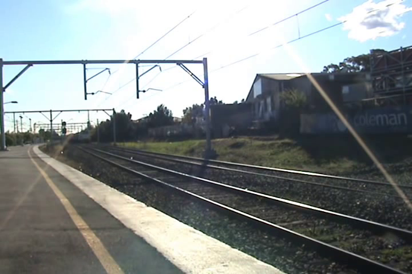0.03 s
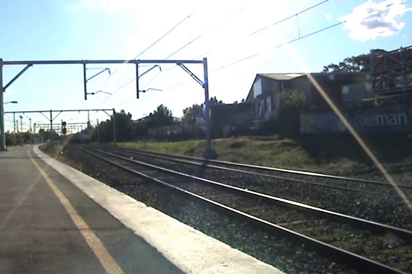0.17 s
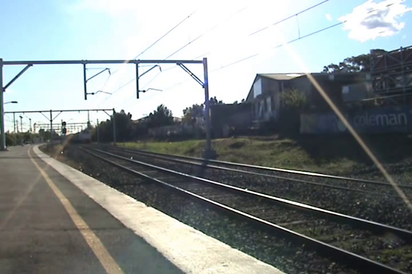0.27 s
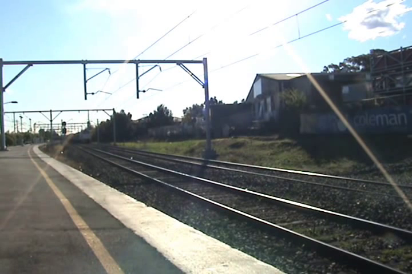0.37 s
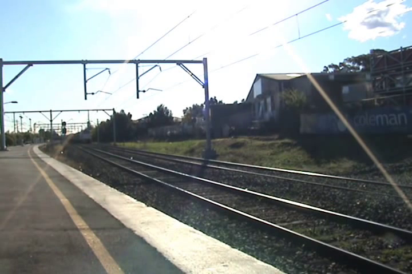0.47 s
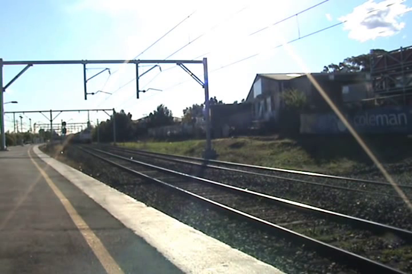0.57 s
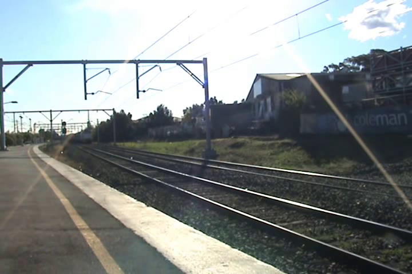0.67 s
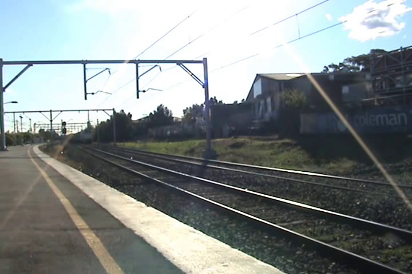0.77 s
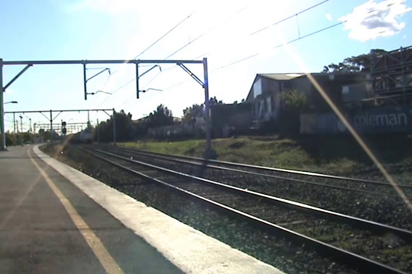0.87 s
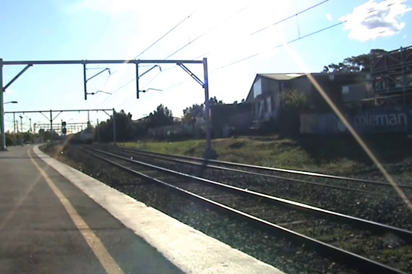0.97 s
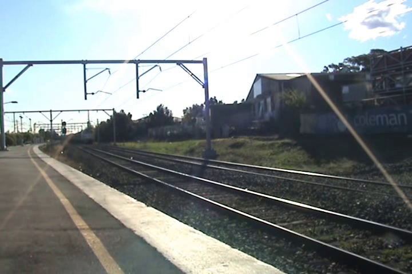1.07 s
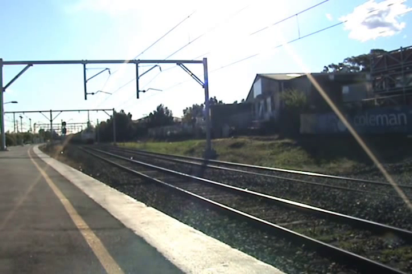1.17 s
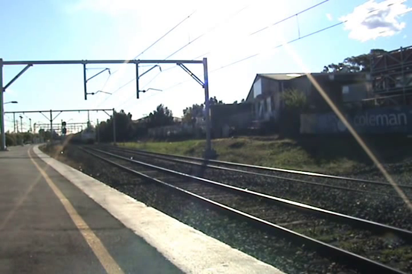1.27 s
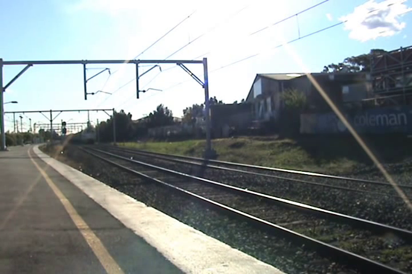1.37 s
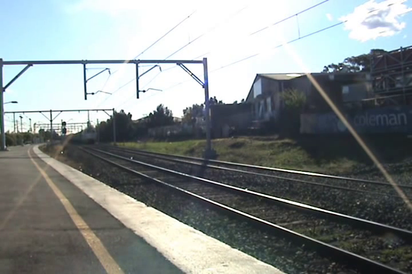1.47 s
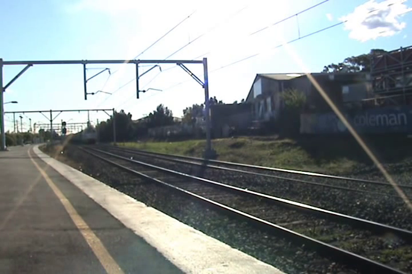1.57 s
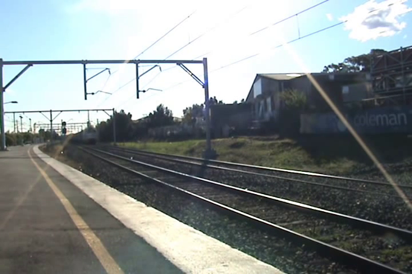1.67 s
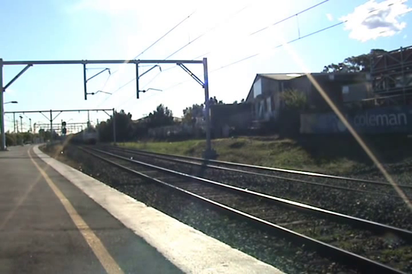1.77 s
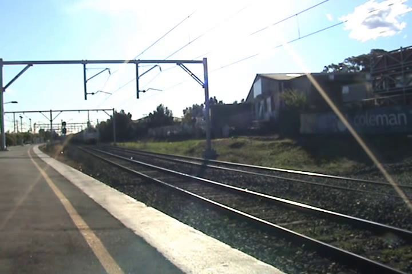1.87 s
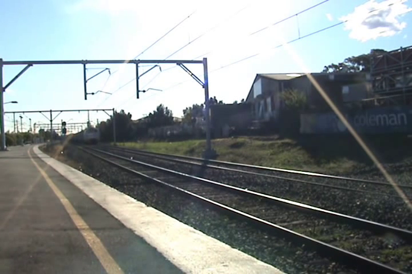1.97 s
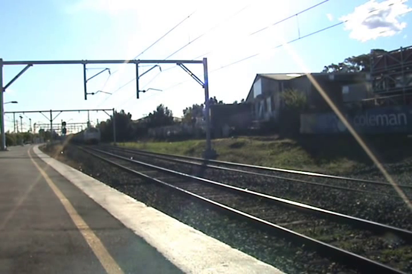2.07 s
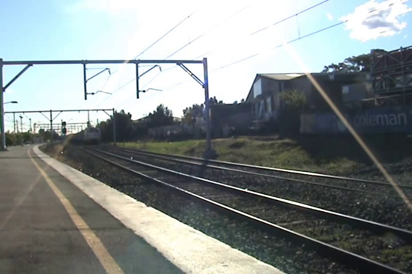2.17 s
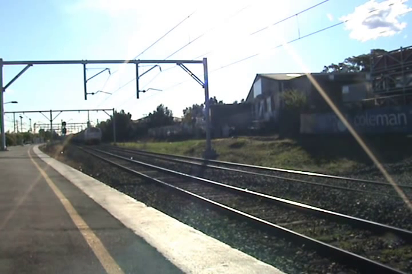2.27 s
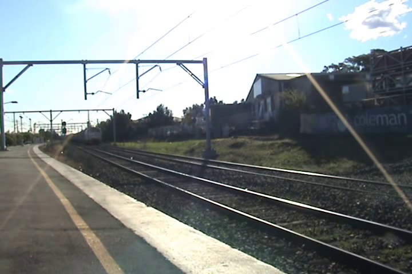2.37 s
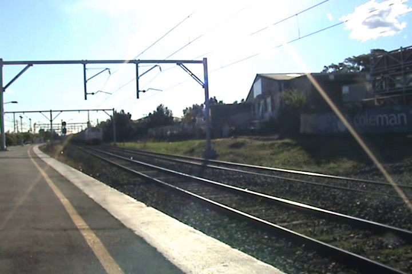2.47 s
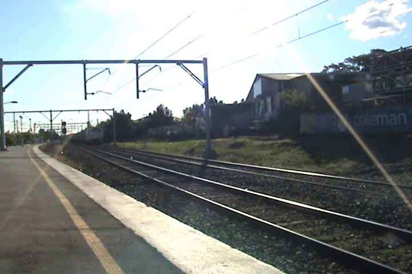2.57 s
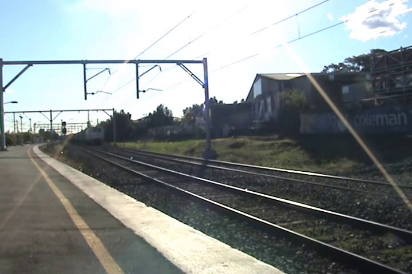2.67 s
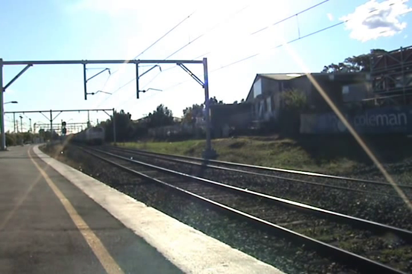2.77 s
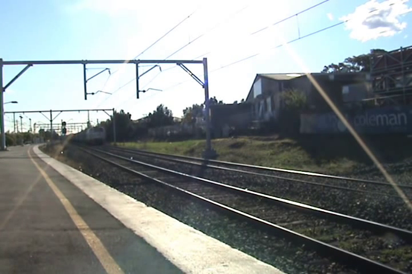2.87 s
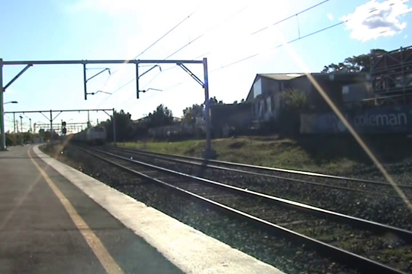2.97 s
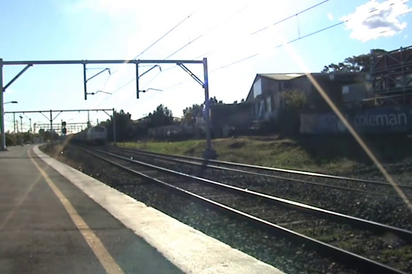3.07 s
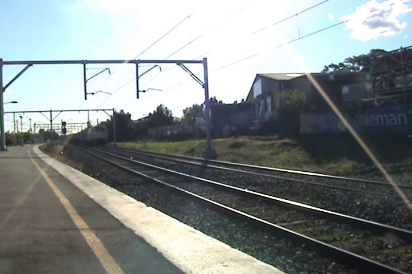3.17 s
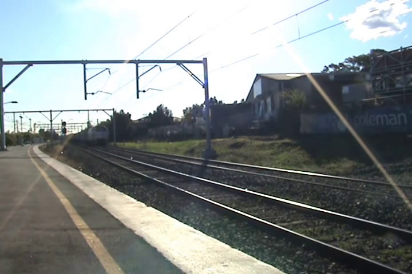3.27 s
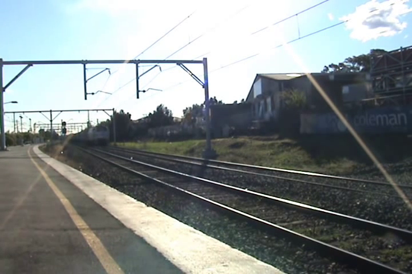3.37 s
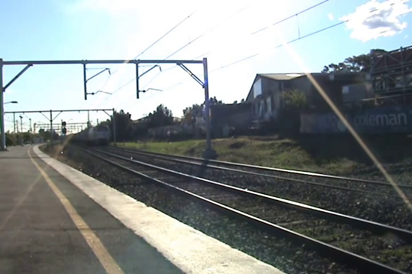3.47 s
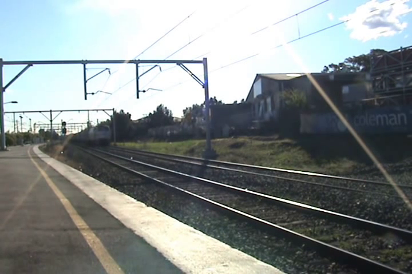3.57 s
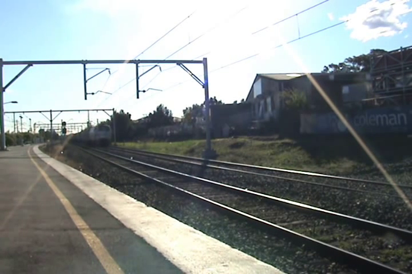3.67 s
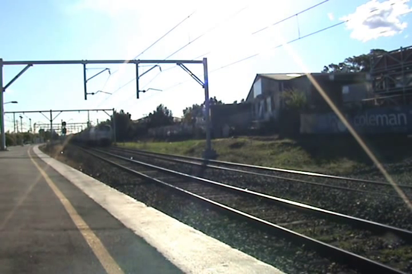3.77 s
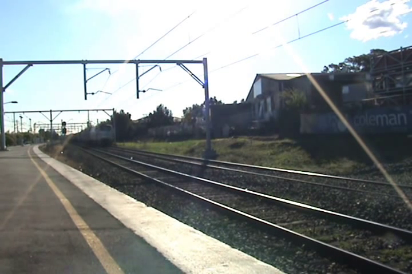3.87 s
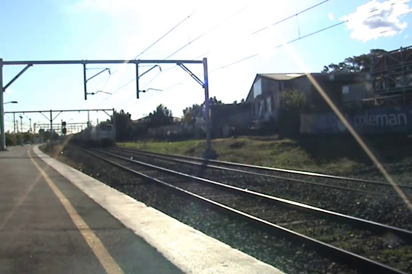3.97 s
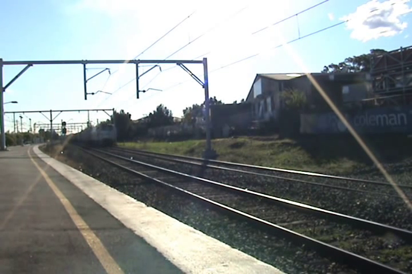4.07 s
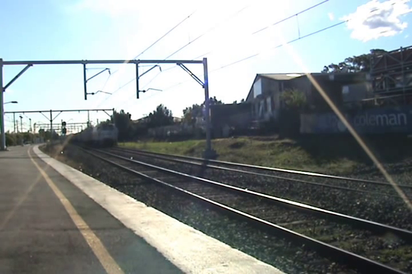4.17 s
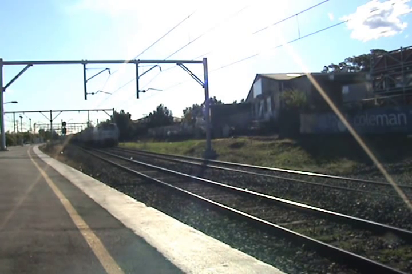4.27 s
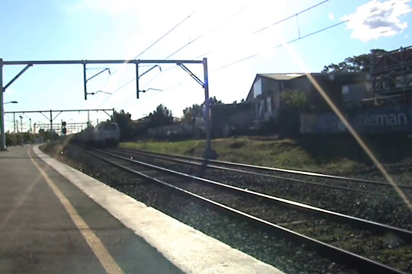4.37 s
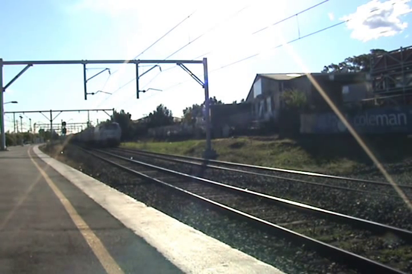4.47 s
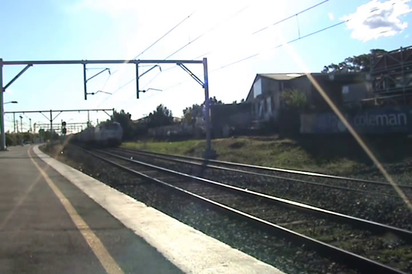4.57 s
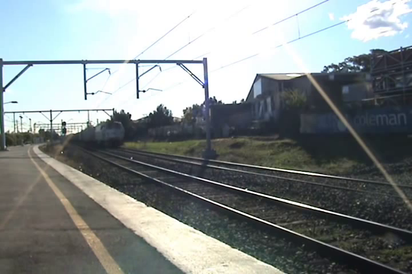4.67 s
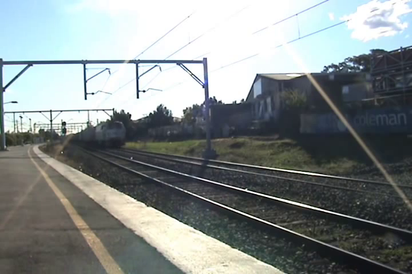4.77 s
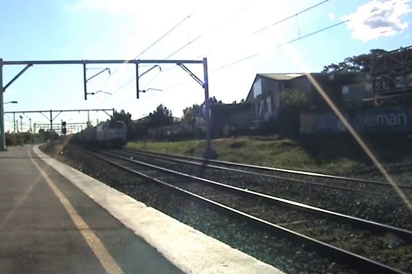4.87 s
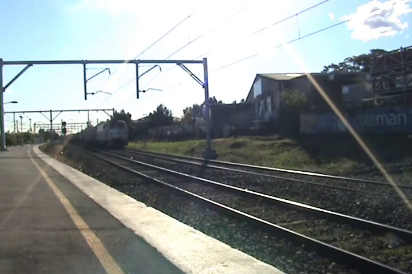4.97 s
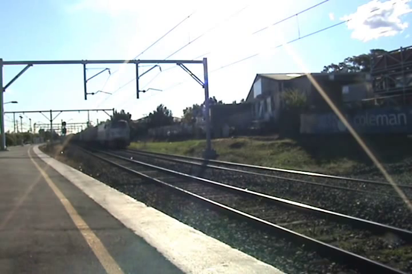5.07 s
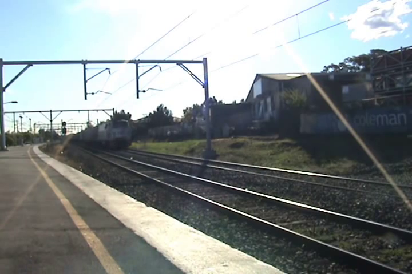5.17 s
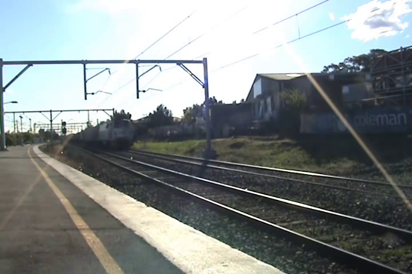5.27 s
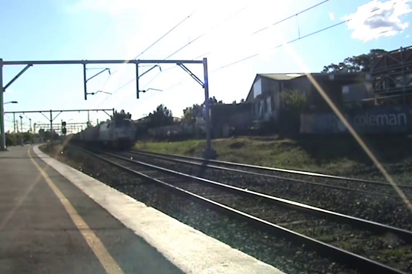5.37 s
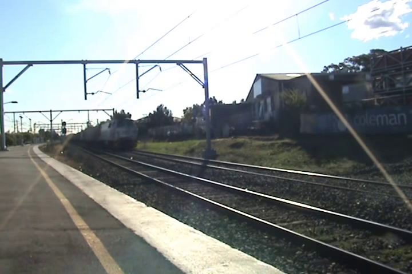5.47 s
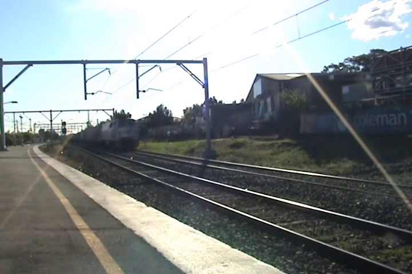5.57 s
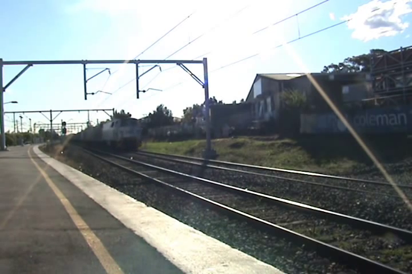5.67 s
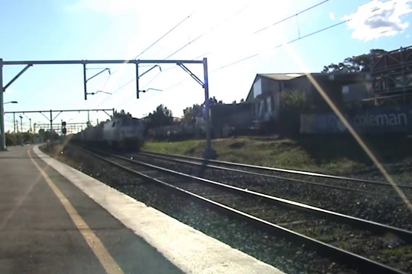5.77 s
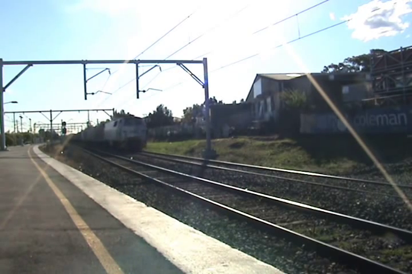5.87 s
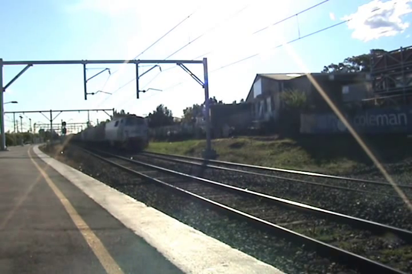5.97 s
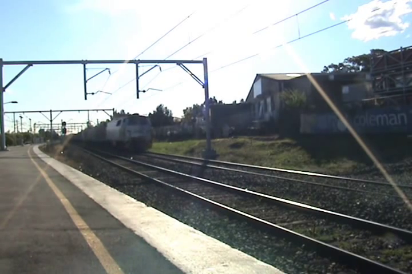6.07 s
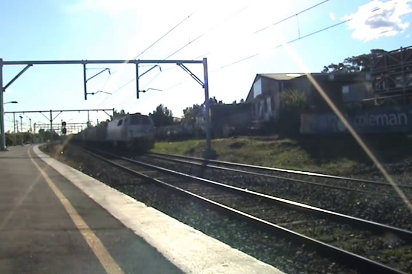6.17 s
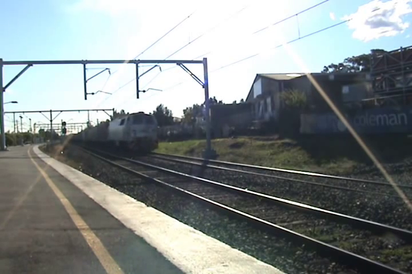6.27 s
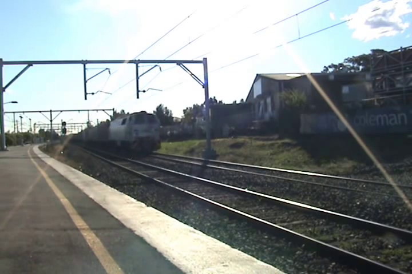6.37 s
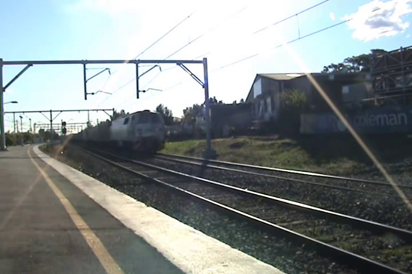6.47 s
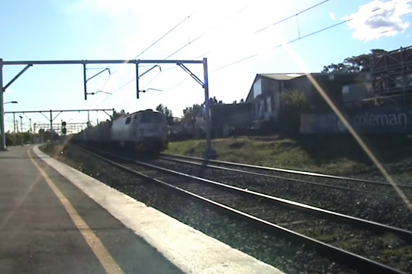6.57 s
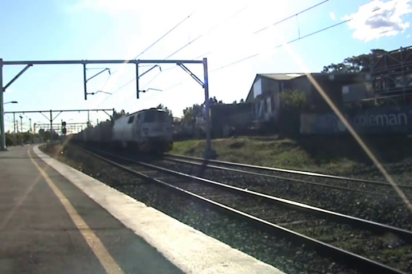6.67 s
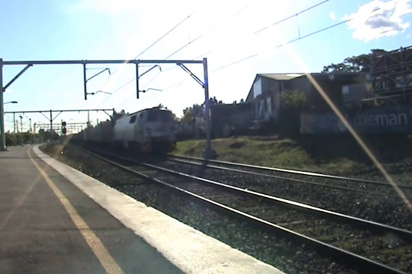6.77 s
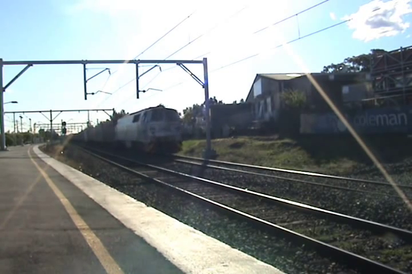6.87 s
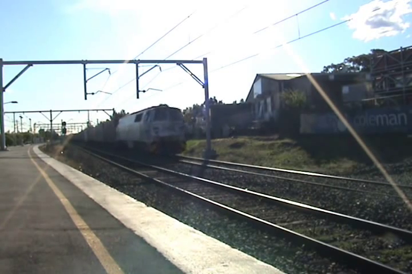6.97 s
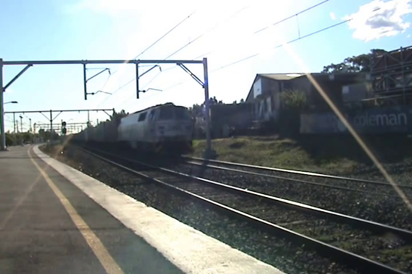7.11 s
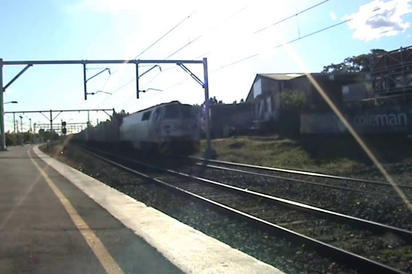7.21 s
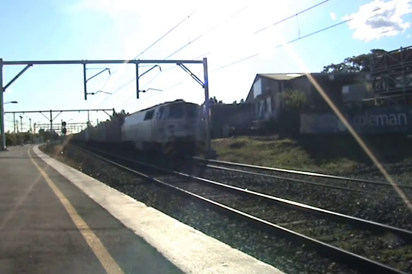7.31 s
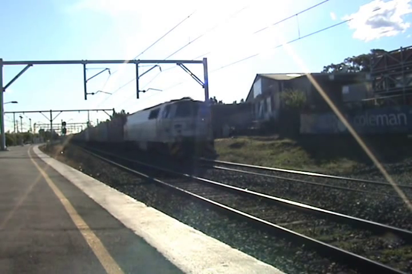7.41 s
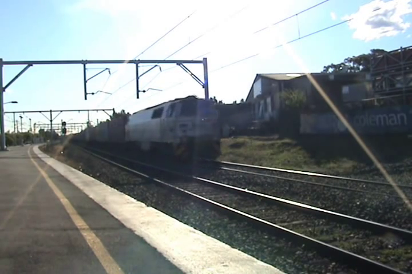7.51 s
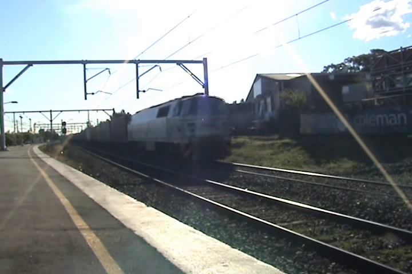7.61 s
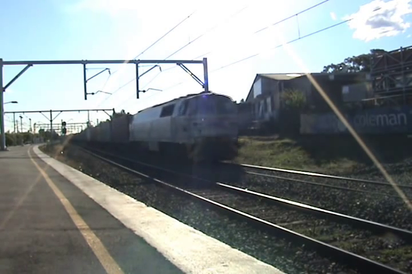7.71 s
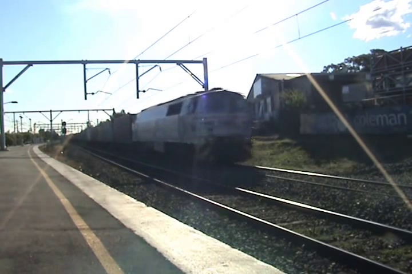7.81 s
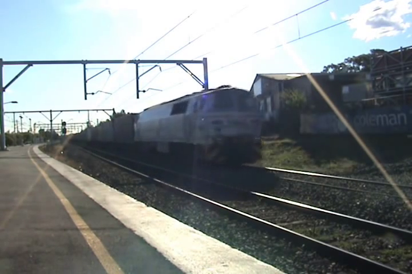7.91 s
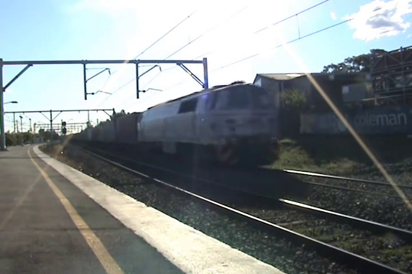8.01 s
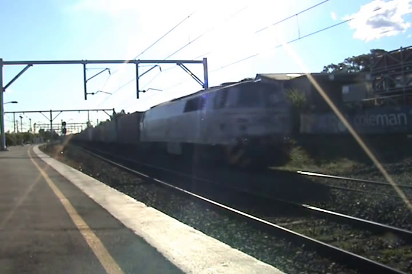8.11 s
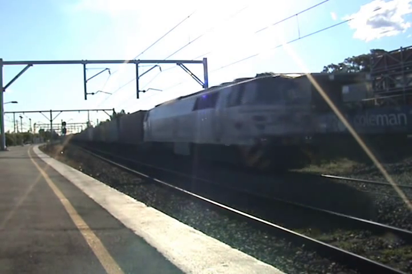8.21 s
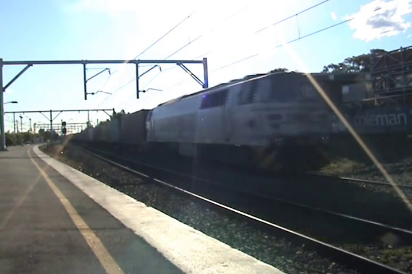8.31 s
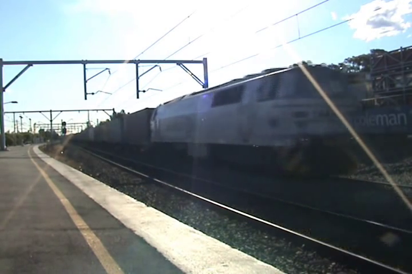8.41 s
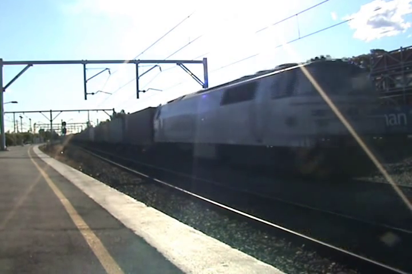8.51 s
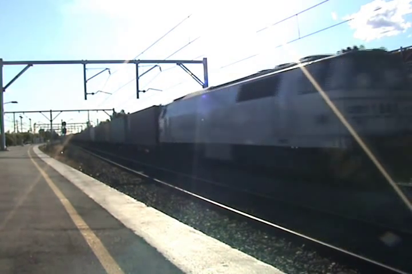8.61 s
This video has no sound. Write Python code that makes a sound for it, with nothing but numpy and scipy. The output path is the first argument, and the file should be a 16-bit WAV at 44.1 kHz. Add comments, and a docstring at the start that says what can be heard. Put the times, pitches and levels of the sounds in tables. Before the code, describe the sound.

A small fixed camera microphone hears a train drawing near in open air. Low uneven ground rumble and faint singing rails come first, with one bouncing thud far off. The engine's throbbing grows heavier, hollow wagon bodies boom, and wheel noise widens into a roar. Joint clatters, groaning metal and short thin squeals crowd the last two seconds, cut off at full loudness.

```python
"""Freight train nearing a platform

A freight train draws near and its locomotive starts to pass a small camera.
Ground rumble, wagon boom, rolling roar, singing rails and hiss are shaped noise, each swelling at its own pace;
the rumble adds orders of the wheel turns, and chugs, groans and lurches are short sagging tones.
A far thud, clatters at rail joints, thin squeals and insect-like shrills ride on top.
The camera samples at half rate."""
import sys
import numpy as np
from scipy import signal
from scipy.fft import rfft, irfft, next_fast_len
from scipy.io import wavfile
from scipy.ndimage import uniform_filter1d

SR = 44100
rng = np.random.default_rng(int(sys.argv[2]) if len(sys.argv) > 2 else 0)


def generate_wav(signal):
    """Clip the signal to [-1, 1] and save it as 16-bit WAV at the path in sys.argv[1]."""
    frames = np.transpose(np.atleast_2d(signal))
    scaled = np.clip(frames, -1, 1) * 32767
    pcm = np.round(scaled).astype(np.int16)
    wavfile.write(sys.argv[1], SR, pcm)


N = 381465  # length in samples

# Hiss of the camera itself. Each row: frequency in Hz, relative density in dB per Hz.
CAMERA_HISS_COLOUR = [(2000, -17), (4500, 0.5), (8000, -10), (10400, -17.5), (11000, -19)]
CAMERA_HISS_DB = -53.5

# Likeness of the noise at the two ports. Each row: frequency in Hz, correlation from 0 to 1.
PORT_LIKENESS = [(20, .7), (50, .9), (110, 0.73), (150, 1), (330, 1), (1500, 0.95), (4000, 0.98), (9000, 1)]
# Phase between the ports. Each row: frequency in Hz, lead of the left port in radians.
LEFT_LEAD = [(20, -0.037), (100, -0.89), (180, -1.36), (300, -1.53), (550, -1.5), (1000, -1.1),
             (2000, -0.65), (4000, -0.35), (9000, 0.)]
# Level between the ports. Each row: frequency in Hz, left minus right in dB.
LEFT_MINUS_RIGHT = [(20, 4), (100, 3.5), (400, 1.8), (1000, .5), (4000, 0.1), (9000, -0.3)]
BAND_EDGE_HZ = 15780

# Bounces of the far thud. Each row: start in seconds, peak level in dB.
THUD_BOUNCES = [(1.036, -19), (1.046, -11), (1.056, -12.5), (1.069, -12.5), (1.083, -14.5), (1.098, -18)]
# Hollow body ringing in the thud. Each row: frequency in Hz, relative level in dB, t60 in seconds.
THUD_MODES = [(77, -8.5, 0.14), (201, -2.5, 0.1), (309, -5.5, .07), (444, -2, 0.028), (760, -11, 0.045),
              (1220, -14.5, 0.035), (1580, -21, .03)]
# Colour of the thud's tail. Each row: frequency in Hz, relative density in dB per Hz.
THUD_COLOUR = [(40, -31), (78, 5), (130, -1), (210, 7.5), (450, 7.5), (900, -4), (1500, -6), (2200, -12),
               (5000, -29)]
THUD_TAIL_S, THUD_TAIL_DB, THUD_TAIL_T60_S = 1.036, -21.5, 1.7

# Swell of the ground rumble. Each row: time in seconds, nominal level in dB.
RUMBLE_LEVEL = [(0, -30.5), (1.2, -26), (2.3, -25), (3, -22), (3.8, -20.5), (4.3, -20.5), (4.9, -19.5),
                (5.5, -22.5), (5.8, -19), (6.3, -16), (7.2, -17.5), (7.8, -20), (8.3, -19), (8.65, -23.5)]
# Colour of the ground rumble. Each row: frequency in Hz, relative density in dB per Hz.
RUMBLE_COLOUR = [(15, -27), (32, -2.5), (48, 1), (75, 1), (105, 1), (121, -9.5), (131, -6), (150, -14)]
# Wheel rotation. Each row: time in seconds, turns per second.
WHEEL_TURNS = [(0, 5.51), (1.65, 5.378), (3.15, 5.235), (4.65, 5.095), (6.15, 4.977), (7.65, 4.876),
               (8.65, 4.815)]
# Single orders swelling into a hum, before the rumble is evened out.
# Each row: centre in seconds, order of the turn rate, nominal peak in dB, half-length in seconds.
ORDER_HUMS = [(0.71, 14, -31, 0.69), (1.6, 14, -34, 0.41), (2.104, 16, -26, 0.5), (2.493, 11, -31, 0.69),
              (5.004, 15, -26.5, 0.36), (6.4, 15, -26, 0.44)]
DEEP_HZ = 72.4  # upper edge of the deepest rumble
RUMBLE_WANDER_DB, RUMBLE_WANDER_S = 0.5, 0.05

# Deep lurches felt through the ground. Each row: centre in seconds, peak level in dB, pitch in Hz.
LURCHES = [(0.175, -26, 63.8), (0.35, -23, 69), (0.711, -24, 71.2), (0.9, -18.5, 71.5), (1.058, -28, 66.6),
           (1.206, -23, 53.6), (1.547, -18, 68), (1.755, -23, 64.9), (2.235, -17, 62.3), (2.749, -15, 62),
           (3.1, -18, 64.4), (3.434, -18, 69.4), (3.626, -17, 72.0), (3.957, -17, 58.6), (4.095, -22, 60),
           (4.293, -14, 63), (4.481, -17, 60), (4.641, -14.9, 62.8), (4.881, -12.5, 66.6),
           (5.078, -14, 61.3), (5.338, -14.1, 67), (5.481, -14, 61.8), (5.635, -14, 53.5),
           (5.798, -14, 53.6), (6.168, -14.5, 65.9), (6.371, -12.5, 63.5), (6.568, -11, 71),
           (6.727, -17, 67), (6.892, -18, 59), (7.071, -14.5, 56.0), (7.261, -11, 67.4), (7.4, -15, 62.3),
           (7.629, -14.5, 58.3), (8.079, -13, 72.5), (8.297, -11.7, 67), (8.456, -14.5, 57.4)]
LURCH_HALF_S, LURCH_SAG_HZ_PER_S = 0.034, 40
LURCH_DUCK = 0.5  # share by which a lurch dips the deepest rumble

# Wagon bodies. Each row: frequency in Hz, relative density in dB per Hz.
BOOM_COLOUR = [(100, -29), (130, -1.5), (180, -1.5), (255, -1), (300, -1), (392, -5.5), (408, -4.5),
               (450, -12.5), (520, -27.5)]
# Main ringing panel. Each row: frequency in Hz, relative density in dB per Hz.
PANEL_COLOUR = [(290, -27), (322, -7.5), (340, -4), (360, -9), (378, -0.5), (395, -13), (410, -15.5),
                (430, -36)]
# Surges of the main panel.
# Each row: centre in seconds, dB above its usual ring, half-length in seconds, pitch of its hum in Hz.
PANEL_SURGES = [(0.983, 6, 0.017, 350), (1.635, 6.5, 0.065, 355), (1.994, 6, 0.039, 350),
                (2.539, 4, 0.072, 355), (3.163, 4.5, 0.065, 360), (3.485, 5, 0.066, 360),
                (4.05, 4.5, 0.023, 362), (5.138, 6.5, 0.045, 352), (5.29, 14, 0.018, 342),
                (5.395, 9.5, 0.048, 367), (5.516, 7, 0.03, 371), (5.829, 3, 0.1, 354),
                (6.074, 5, 0.093, 349), (6.282, 2, 0.21, 352), (6.487, 9.5, 0.033, 362),
                (6.61, 10, 0.023, 360), (6.718, 9, 0.078, 361), (6.957, 8, 0.07, 355),
                (7.193, 7, 0.04, 361), (7.343, 8.5, 0.077, 357), (7.537, 11.5, 0.025, 362),
                (7.62, 8, 0.048, 355), (7.845, 8, 0.027, 355), (7.951, 4.5, 0.083, 340),
                (8.082, 5, 0.06, 341), (8.371, 3.5, 0.094, 356), (8.507, 6.5, 0.03, 353),
                (8.616, 7, 0.062, 358)]
PANEL_WANDER_DB, PANEL_WANDER_S = 1.7, 0.046
WAVER_HZ, WAVER_S = 9, 0.031  # the hum wavers in pitch
FLUTTER_DB, FLUTTER_S = 1.2, 0.012  # and flutters in level

# Wheels clattering over rail joints. Each row: start in seconds, nominal level in dB, t60 in seconds.
CLATTERS = [(1.034, -42, 0.6), (1.79, -43, 0.4), (4.44, -35, 0.65), (5.84, -35, .3), (6.37, -28, 0.21),
            (6.58, -30, 0.55), (6.87, -35, 0.22), (7.12, -28, .2), (7.49, -35, 0.13), (7.65, -26, .2),
            (8.01, -23, 0.16), (8.055, -22.5, 0.43), (8.285, -20, 0.2), (8.445, -21, .2), (8.495, -31, 0.1)]
# Colour of the clatters. Each row: frequency in Hz, relative density in dB per Hz.
CLATTER_COLOUR = [(1500, -15), (2500, 4), (4500, -3.5), (7000, -12.5), (10500, -27), (11000, -66)]

# Thin squeals and high insect-like shrills. Each row: start in seconds, length in seconds,
# first pitch in Hz, last pitch in Hz, first level in dB, last level in dB, width in Hz.
SQUEALS = [(.03, .13, 3790, 3740, -59, -60, 13), (.15, .14, 3715, 3730, -59, -58.5, 13),
           (.29, .11, 3765, 3695, -56.5, -56.5, 12), (.39, .14, 3700, 3675, -60, -57, 16),
           (.53, .2, 3640, 3630, -59.5, -61, 16), (.08, .52, 8100, 8100, -67, -71, 350),
           (.6, .56, 8300, 7980, -69, -65, 350), (6.362, .055, 3200, 2700, -38, -34, 110),
           (7.3, 1.24, 4450, 4650, -50, -39, 35), (7.77, .07, 2460, 2440, -34, -34, 35),
           (8.012, .035, 2870, 2870, -27, -28, 60), (8.04, .11, 2520, 2500, -30.5, -30.5, 40),
           (8.16, .09, 2430, 2460, -31, -28, 60), (8.16, .08, 2860, 2930, -30, -28, 40),
           (8.25, .18, 2410, 2370, -32, -30.5, 40), (8.27, .06, 3250, 3220, -33, -35, 60),
           (8.32, .09, 2720, 2820, -35, -33, 50), (8.39, .06, 2960, 2990, -33, -33, 60),
           (8.51, .14, 2950, 2980, -35, -31, 70)]
CHATTER_DB, CHATTER_S = 2, 0.012  # their level chatters

# Approaching train. Each row: time in seconds, loudness in dB, level of the rolling roar in dB,
# level of the hiss in dB.
APPROACH = [(0, -40, -35, -48), (.7, -39.5, -34, -49), (1.5, -37.5, -32.5, -48.5), (2.5, -35, -31, -44.5),
            (3.5, -34, -29.5, -43), (4.5, -32, -28.5, -39), (5.5, -31, -28.5, -37.5),
            (6.2, -30, -27.5, -34.5), (6.8, -28.5, -26, -31), (7.4, -26.5, -23.5, -30.5),
            (7.9, -25, -21.5, -29), (8.2, -23, -21, -26), (8.65, -23, -20, -26)]
# How each layer follows the loudness. Each row: offset in dB, share of the swell.
BOOM_LAW = (5.32, 0.91)
RING_LAW = (1.24, 1)
SING_LAW = (0.96, 1.016)
# Rolling roar. Each row: frequency in Hz, relative density in dB per Hz.
ROLL_COLOUR = [(250, -53), (420, -8), (471, -4.5), (751, -7), (868, -8), (968, -9.5), (1270, -11.5),
               (1450, -21), (1880, -18.5), (3190, -120)]
# Singing rails and wheel discs. Each row: frequency in Hz, relative density in dB per Hz.
SING_COLOUR = [(790, -26), (1350, -0.5), (1890, 1.5), (2080, 0.5), (2490, -1.5), (2960, -2.5), (3400, -11),
               (4420, -18.5), (7480, -120)]
# Rolling hiss before air loss. Each row: frequency in Hz, relative density in dB per Hz.
HISS_COLOUR = [(1880, -14), (3200, -3.5), (6170, -13.5), (8410, -20.5), (9770, -22.5), (11000, -37),
               (14300, -73), (22000, -120)]
# Singing modes. Each row: frequency in Hz, width in Hz, mean lift above the singing colour in dB.
WHEEL_MODES = [(1900, 58, 3), (2460, 104, 4.5), (2950, 80, 2.5)]
MODE_SWING = 0.3  # rms share by which each mode's lift comes and goes
START_METRES, SPEED_M_PER_S = 216, 23  # distance at the start, closing speed
PAN_START_DB, PAN_END_DB = 3, -1.5  # left minus right: the singing drifts from left to right
ROLL_SURGE_DB, ROLL_SURGE_S = 0.53, 0.025  # surges shared by roar, singing and hiss

# Lower panel groaning as the locomotive arrives. Each row: centre in seconds, peak level in dB, pitch in Hz.
GROANS = [(6.718, -20, 258), (6.888, -17, 260), (7.111, -14.5, 264), (7.342, -14, 258), (7.729, -16.5, 290),
          (7.929, -10.5, 260), (8.146, -15, 240), (8.369, -8.5, 242), (8.498, -11.5, 296), (8.599, -8, 263)]
GROAN_HALF_S, GROAN_SAG_HZ_PER_S = 0.023, 300
# Engine chugs, about one per wheel turn. Each row: centre in seconds, peak level in dB, pitch in Hz.
CHUGS = [(2.327, -18, 90), (2.563, -14.5, 95), (2.715, -19, 95.4), (2.928, -15, 96.4), (3.104, -15, 100),
         (3.3, -13.5, 99), (3.483, -16, 98), (3.68, -15, 82.4), (3.876, -12.5, 99), (4.065, -13.5, 97),
         (4.199, -28, 91), (4.339, -19, 92.5), (4.472, -30, 94), (4.708, -13, 97.8), (4.875, -13.5, 94.4),
         (5.05, -15.5, 83), (5.31, -11, 98), (5.501, -12, 101), (5.703, -12, 95.3), (5.9, -12.7, 105),
         (6.044, -9.5, 112), (6.242, -10, 112.5), (6.444, -9.5, 109.4), (6.651, -10.5, 106),
         (6.851, -6.5, 102.3), (7.049, -8.5, 104.7), (7.258, -8.5, 99), (7.464, -7.5, 93.5),
         (7.668, -11, 101), (7.882, -10, 92), (8.117, -13.5, 86), (8.255, -13.5, 106), (8.434, -14, 89)]
CHUG_HALF_S, CHUG_SAG_HZ_PER_S = 0.031, 260
CHUG_DUCK = 0.75  # share by which a chug dips the rumble above its deepest part
OFFBEAT_DB = -12  # a weaker chug midway between each two


def gain_of(db):
    """Turns dB into a linear gain."""
    return 10 ** (np.asarray(db) / 20)


def evened(x):
    """Scales a signal to rms 1."""
    return x / np.sqrt(np.mean(x ** 2) + 1e-20)


def read(points, hz):
    """Reads a frequency table between its points, on a log frequency axis."""
    f, value = np.transpose(points)
    return np.interp(np.log(hz + 1), np.log(f + 1), value)


def curves(rows):
    """Draws each column after the first as a line over time."""
    s, *columns = np.transpose(rows)
    return [np.interp(np.arange(N) / SR, s, column) for column in columns]


def chance(s):
    """Slow random wander of rms 1 that changes over about s seconds."""
    width = max(round(s * SR), 1)
    smooth = uniform_filter1d(rng.standard_normal(N), size=width)
    return evened(uniform_filter1d(smooth, size=width))


def swell(s, half_s):
    """Smooth hump of height 1 centred on s, down to 1/e at half_s either side."""
    return np.exp(-((np.arange(N) / SR - s) / half_s) ** 2)


def follows(law):
    """Level in dB of a layer that swells as the train nears."""
    offset_db, share = law
    return offset_db + share * curves(APPROACH)[0]


def burst(s, db, rise_s, t60):
    """Envelope of one blow: soft rise, exponential fall."""
    t = np.maximum(np.arange(N) / SR - s, 0)
    return gain_of(db - 60 * t / t60) * (1 - np.exp(-t / rise_s))


def steadied(x, s):
    """Evens out swells slower than about s seconds."""
    power = uniform_filter1d((x ** 2).mean(0), round(s * SR))
    return evened(x / np.sqrt(abs(power) + 0.046))


def resonate(x, hz, width):
    """Gliding resonance: shifts the curve hz down to zero, smooths twice and shifts back."""
    turn = np.exp(2j * np.pi * np.cumsum(hz * np.ones(N)) / SR)
    r = np.exp(-np.pi * width / SR)
    low = signal.lfilter([1 - r], [1, -r], x / turn)
    low = signal.lfilter([1 - r], [1, -r], low)
    return evened((turn * low).real)


def noise(colour, size=1024, patchy_db=0., flicker_db=0., metres=None, same=PORT_LIKENESS, modes=()):
    """Two-port noise from random spectra of equal power, with patches, shared flicker and air loss."""
    hop, hz = size // 4, np.fft.rfftfreq(size, 1 / SR)
    frames = N // hop + 5
    a, b, c, d, patches = rng.standard_normal((frames, len(hz), 5)).T
    patches = uniform_filter1d(patches, size=16, axis=0)
    patches = evened(uniform_filter1d(patches, size=10, axis=1))
    flicker = evened(uniform_filter1d(rng.standard_normal(frames), size=4))

    f = np.transpose(colour)[0]
    outside = (hz < f[0]) | (hz > f[-1])
    db = (read(colour, hz) - 200 * outside)[:, None] * np.ones(frames)
    for peak_hz, width, peak_db in modes:
        swing = 1 + MODE_SWING * evened(uniform_filter1d(rng.standard_normal(frames), size=24))
        peak = peak_db / (1 + (2 * (hz - peak_hz) / width) ** 2)
        db = db + peak[:, None] * swing
    if metres is not None:  # air takes the treble first
        frame_metres = metres[np.minimum(np.arange(frames) * hop, N - 1)]
        db = db - 0.12 * (hz[:, None] / 8000) ** 1.03 * frame_metres
    shape = gain_of(db) / np.linalg.norm(gain_of(db), axis=0)

    like = np.clip(read(same, hz), -1, 1)[:, None]
    left = a + 1j * b
    right = like * left + np.sqrt(1 - like ** 2) * (c + 1j * d)
    spectra = np.array([left, right]) * shape * gain_of(patchy_db * patches + flicker_db * flicker)
    return evened(signal.istft(spectra, nperseg=size, noverlap=size - hop)[1][:, :N])


def booms(rows, half_s, sag_hz_per_s):
    """Short tones under a smooth hump whose pitch sags."""
    t = np.arange(-3 * half_s, 3 * half_s, 1 / SR)
    out = np.zeros(N + SR)
    for s, db, hz in rows:
        cycles = hz * t - sag_hz_per_s * t ** 2 / 2 + rng.random()
        first = round((s + t[0]) * SR)
        out[first:first + len(t)] += gain_of(db) * np.exp(-(t / half_s) ** 2) * np.cos(2 * np.pi * cycles)
    return out[:N]


def hush(rows, half_s, share):
    """Gain that dips by share round each boom; overlapping dips add up."""
    dips = sum(swell(row[0], 2 * half_s) for row in rows)
    return np.clip(1 - share * dips, 0, 1)


def camera_hiss():
    """Steady self-noise of the camera, little alike at the two ports in the lows."""
    return gain_of(CAMERA_HISS_DB) * noise(CAMERA_HISS_COLOUR, same=[(20, .3), (20000, 0.63)])


def thud():
    """A heavy far blow that bounces, rings a hollow body and dies away in the yard."""
    hits = np.zeros(N)
    for s, db in THUD_BOUNCES:
        hits[round(s * SR)] = gain_of(db)
    t = np.arange(SR // 4) / SR
    ring = sum(gain_of(db - 60 * t / t60) * np.sin(2 * np.pi * hz * t) for hz, db, t60 in THUD_MODES)
    ring = ring * (1 - np.exp(-t / 0.0021))  # a blunt blow
    tail = burst(THUD_TAIL_S, THUD_TAIL_DB, 0.011, THUD_TAIL_T60_S) * noise(THUD_COLOUR, size=2048)
    return signal.oaconvolve(hits, ring / abs(ring).max())[:N] + tail


def wheel_thumps(level):
    """Out-of-round wheels repeat their thumps each turn: a sum of orders of the turn rate."""
    step, orders = 64, np.arange(6, 29)  # the orders are low, so every 64th sample will do
    turn_rate = curves(WHEEL_TURNS)[0]
    angle = 2 * np.pi * (np.cumsum(turn_rate) / SR)[::step]
    a, b = uniform_filter1d(rng.standard_normal((len(angle), len(orders), 2)), size=500, axis=0).T
    drift = (a + 1j * b) / np.sqrt(np.mean(a ** 2 + b ** 2))  # each order wanders in size and phase
    colour = gain_of(read(RUMBLE_COLOUR, orders[:, None] * turn_rate[::step]))
    weak = evened((colour * drift * np.exp(1j * orders[:, None] * angle)).real.sum(0))
    thumps = 0.79 * weak * level[::step]
    for s, order, peak_db, half_s in ORDER_HUMS:
        tone = np.cos(round(order) * angle + 2 * np.pi * rng.random())
        thumps = thumps + np.sqrt(2) * gain_of(peak_db) * swell(s, half_s)[::step] * tone
    return signal.resample_poly(thumps, step, 1)[:N] / level


def rumble():
    """Wheel thumps over ground noise, dipping round each chug and lurch."""
    level = gain_of(curves(RUMBLE_LEVEL)[0])
    ground = noise(RUMBLE_COLOUR, size=4096, same=[(20, .3), (60, 0.95), (150, 0.66)])
    even = steadied(wheel_thumps(level) + 0.54 * ground, 0.035)
    even = even * gain_of(RUMBLE_WANDER_DB * chance(RUMBLE_WANDER_S))
    deep = signal.sosfiltfilt(signal.butter(2, DEEP_HZ, fs=SR, output="sos"), even)
    upper = hush(CHUGS, CHUG_HALF_S, CHUG_DUCK) * (even - deep)
    deep = hush(LURCHES, LURCH_HALF_S, LURCH_DUCK) * deep
    return level * (upper + deep + 0.27 * ground)


def lurches():
    """Deep jolts felt through the ground: short low tones with a slight sag."""
    return booms(LURCHES, LURCH_HALF_S, LURCH_SAG_HZ_PER_S)


def wagon_boom():
    """Hollow wagon bodies: broad low noise and one panel that rings, with a wavering hum when it surges."""
    body, panel = noise(BOOM_COLOUR, size=2048), noise(PANEL_COLOUR, size=4096)
    surge = gain_of(sum(db * swell(s, half_s) for s, db, half_s, hz in PANEL_SURGES))
    hz = curves(PANEL_SURGES)[2] + WAVER_HZ * chance(WAVER_S)
    tone = np.cos(2 * np.pi * (np.cumsum(hz) / SR + rng.random()))
    flutter = evened(gain_of(FLUTTER_DB * chance(FLUTTER_S)))
    hum = np.sqrt(2 * abs(surge ** 2 - 1)) * flutter * tone  # power the surge adds to the ring
    ring = steadied(panel, 0.089) + hum
    ring_db = follows(RING_LAW) + PANEL_WANDER_DB * chance(PANEL_WANDER_S)
    return gain_of(follows(BOOM_LAW)) * body + gain_of(ring_db) * ring


def clatters():
    """Wheels striking rail joints: treble noise bursts smeared by the yard."""
    envelope = sum(burst(s, db, 0.0029, t60) for s, db, t60 in CLATTERS)
    return envelope * noise(CLATTER_COLOUR, size=512)


def squeal(start, length, first_hz, last_hz, first_db, last_db, width):
    """A thin squeal or high insect-like shrill: noise through a narrow resonance that glides and wavers."""
    hz, db = curves([(start, first_hz, first_db), (start + length, last_hz, last_db)])
    t = np.arange(N) / SR - start
    gate = np.clip(np.minimum(t, length - t) / 0.01, 0, 1)  # 10 ms fades
    tone = resonate(rng.standard_normal(N), hz * (1 + 0.0025 * chance(0.04)), width)
    chatter = evened(gain_of(CHATTER_DB * chance(CHATTER_S)))
    return gain_of(db) * chatter * gate * steadied(tone[None], 0.041)


def wheels():
    """Rough rolling contact: a roar, rails and wheel discs singing at their modes, a hiss dulled by distance."""
    _, roll_db, hiss_db = curves(APPROACH)
    roll = gain_of(roll_db) * noise(ROLL_COLOUR, patchy_db=0.3, flicker_db=0.8)
    pan_db = np.linspace(PAN_START_DB, PAN_END_DB, N)
    sing_db = follows(SING_LAW) + np.array([pan_db, -pan_db]) / 2
    sing = gain_of(sing_db) * noise(SING_COLOUR, patchy_db=0.46, flicker_db=0.44, modes=WHEEL_MODES)
    metres = START_METRES - SPEED_M_PER_S * np.arange(N) / SR
    hiss = gain_of(hiss_db) * noise(HISS_COLOUR, size=512, patchy_db=1., flicker_db=1., metres=metres)
    return gain_of(ROLL_SURGE_DB * chance(ROLL_SURGE_S)) * (roll + sing + hiss)


def locomotive():
    """Engine chugs with weaker offbeats, and a lower panel groaning: short tones that sag steeply."""
    offbeats = (np.array(CHUGS[1:]) + CHUGS[:-1]) / 2 + [0, OFFBEAT_DB, 0]
    chugs = booms(CHUGS, CHUG_HALF_S, CHUG_SAG_HZ_PER_S)
    chugs = chugs + booms(offbeats, CHUG_HALF_S, CHUG_SAG_HZ_PER_S)
    return chugs + booms(GROANS, GROAN_HALF_S, GROAN_SAG_HZ_PER_S)


def scene():
    """Layers the train over the camera hiss, from background to locomotive."""
    background = camera_hiss() + thud() + rumble() + lurches()
    squeals = sum(squeal(*row) for row in SQUEALS)
    return background + wagon_boom() + clatters() + squeals + wheels() + locomotive()


def record(dry):
    """Two ports with a phase shift, overload, half-rate samples each held twice (treble mirrors), band limit."""
    size = next_fast_len(N)
    hz = np.fft.rfftfreq(size, 1 / SR)
    half = gain_of(read(LEFT_MINUS_RIGHT, hz) / 2) * np.exp(.5j * read(LEFT_LEAD, hz))
    ports = np.array([half, 1 / half]) / abs(half + 1 / half) * 2  # the sum of both ports keeps its colour
    lift = (hz < SR / 4) / np.cos(np.pi * np.minimum(hz, SR / 4) / SR)  # treble lift ahead of the hold
    lift = lift / np.sqrt(1 + (hz / 10500) ** 40)  # steep fall before the half-rate limit
    x = irfft(rfft(dry, size) * ports * lift, size)[:, :N]
    x = np.clip(x, -.97, .97)
    held = np.repeat(x[:, ::2], 2, axis=1)[:, :N]
    band_limit = signal.firwin(1023, BAND_EDGE_HZ, window=("kaiser", 9), fs=SR)
    return signal.oaconvolve(held, band_limit[None], "same")


dry = scene()
out = record(dry)
generate_wav(out)
```